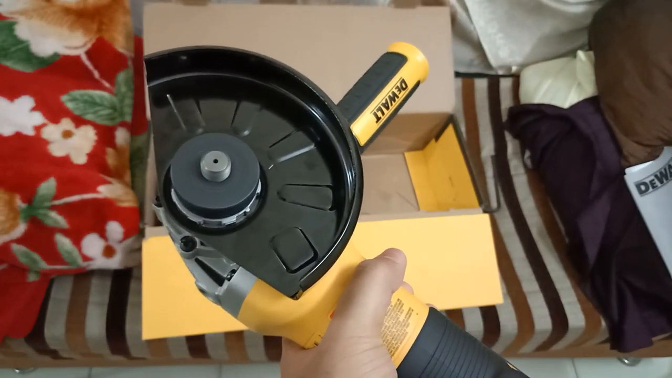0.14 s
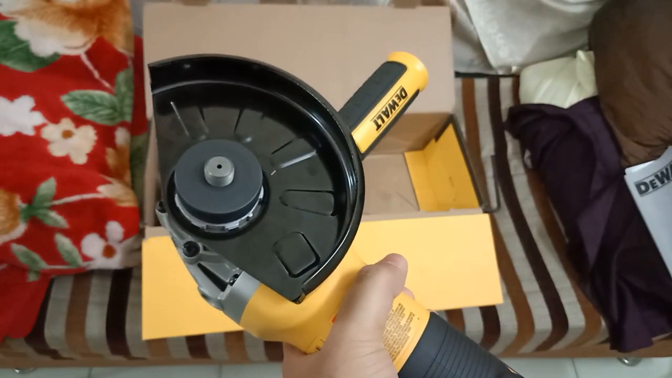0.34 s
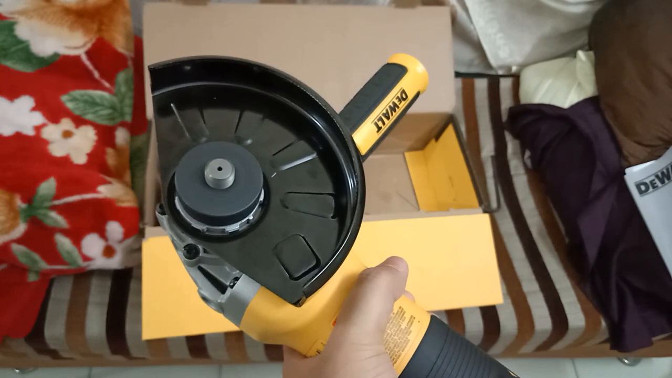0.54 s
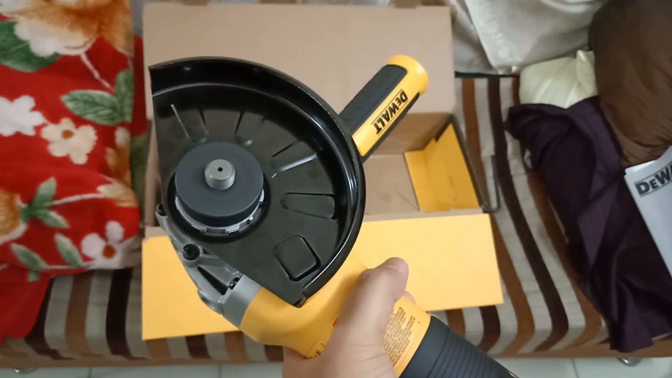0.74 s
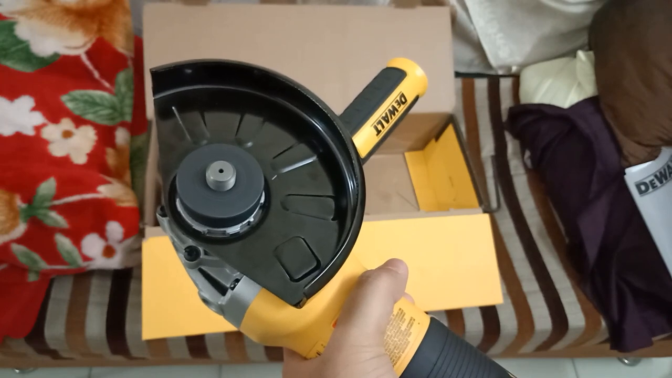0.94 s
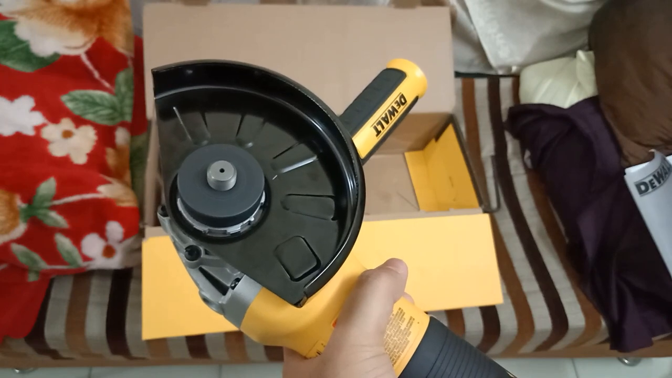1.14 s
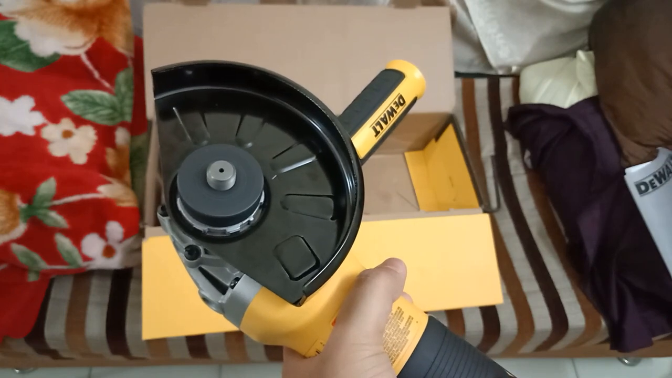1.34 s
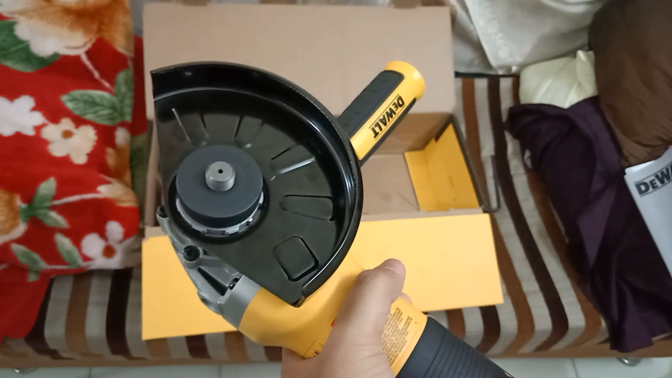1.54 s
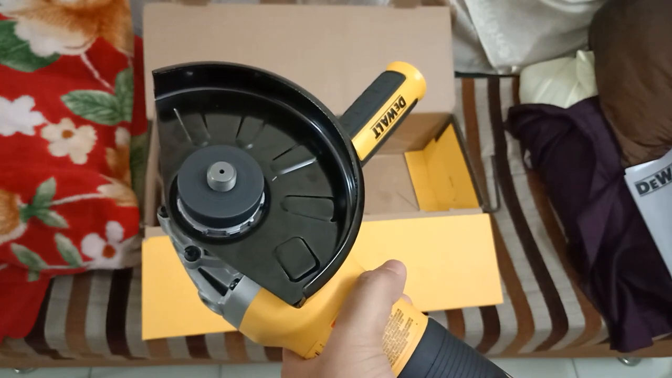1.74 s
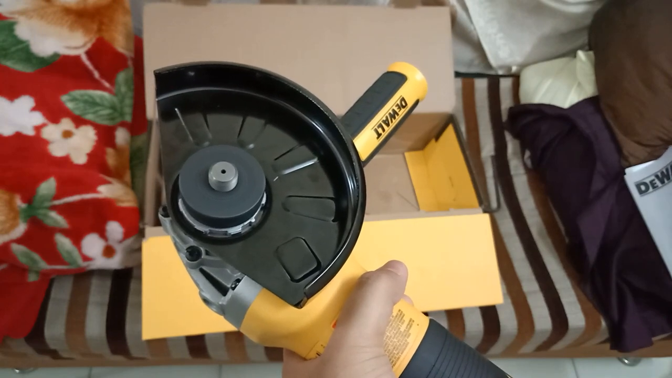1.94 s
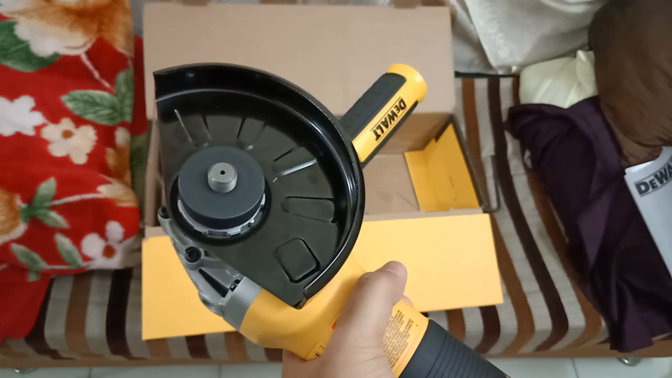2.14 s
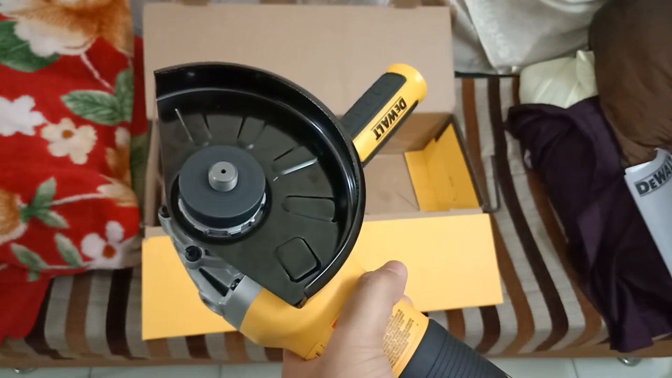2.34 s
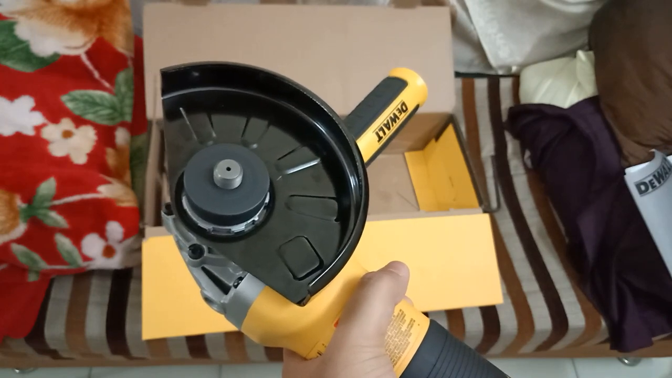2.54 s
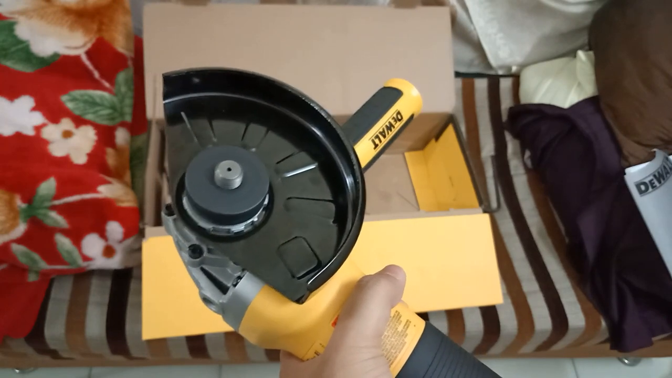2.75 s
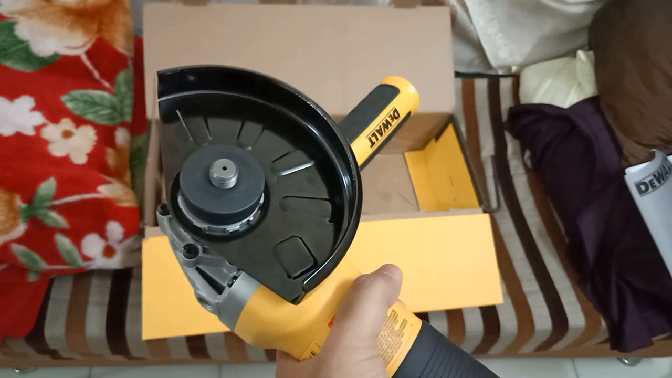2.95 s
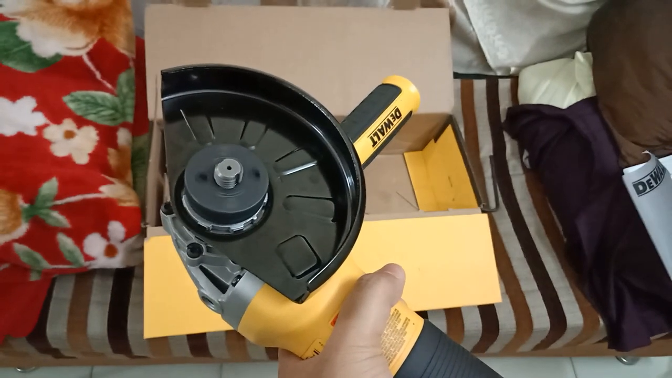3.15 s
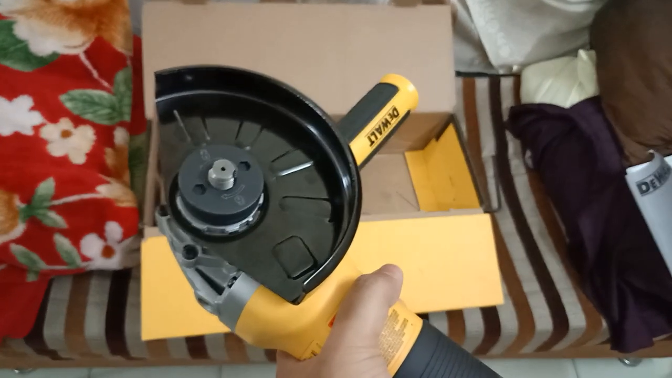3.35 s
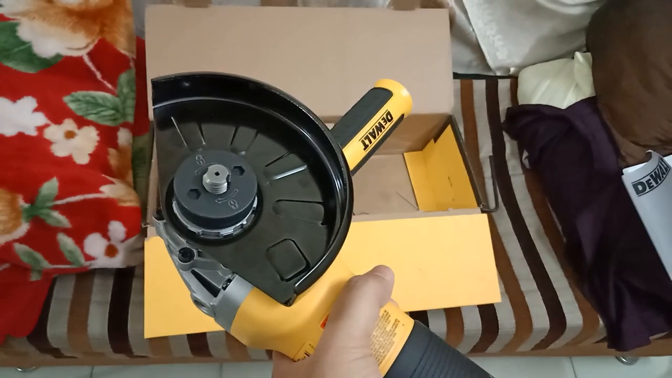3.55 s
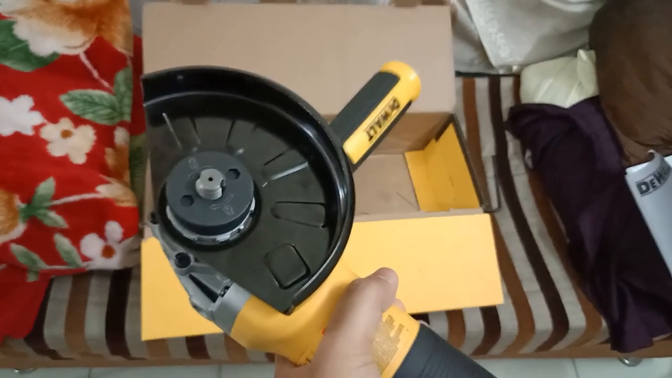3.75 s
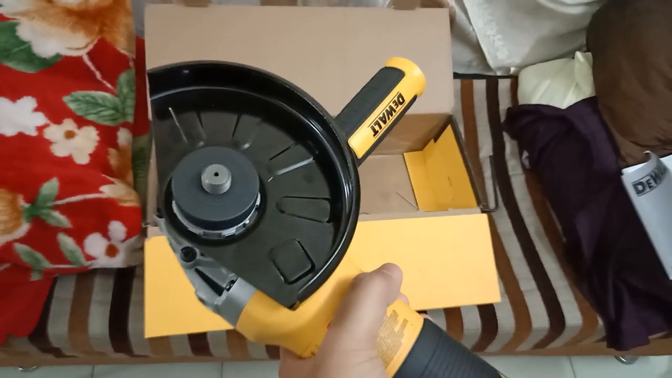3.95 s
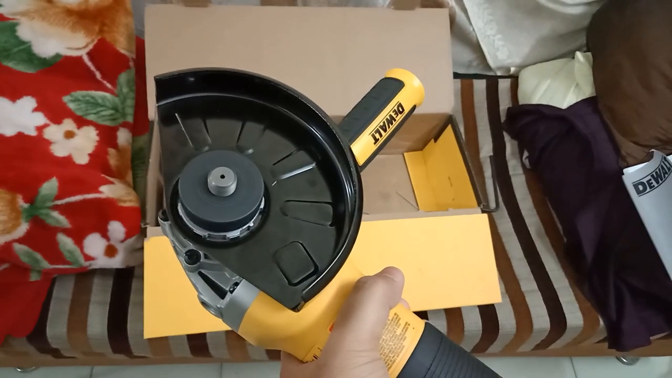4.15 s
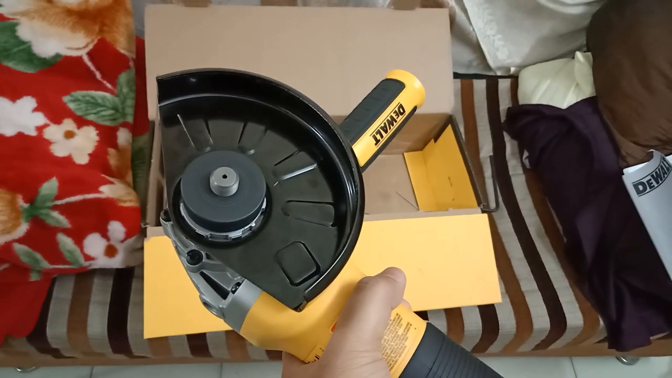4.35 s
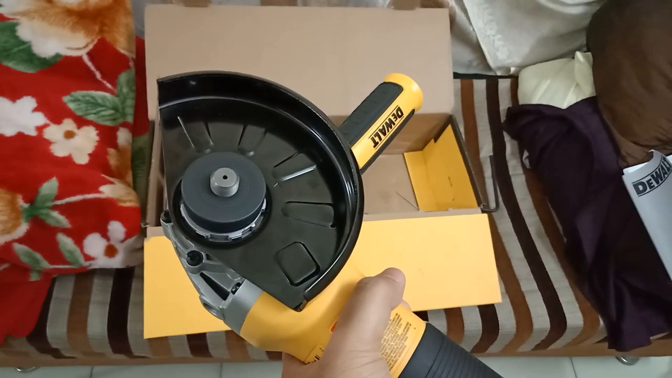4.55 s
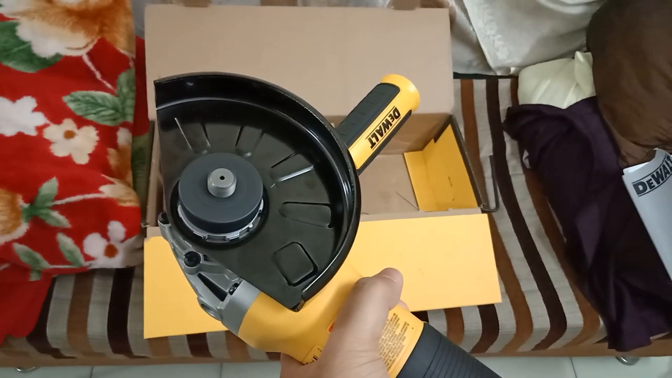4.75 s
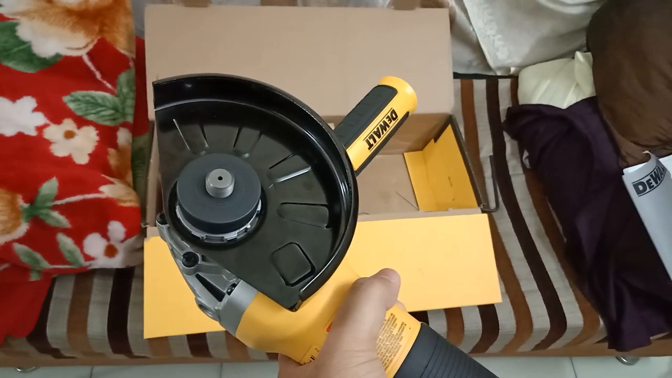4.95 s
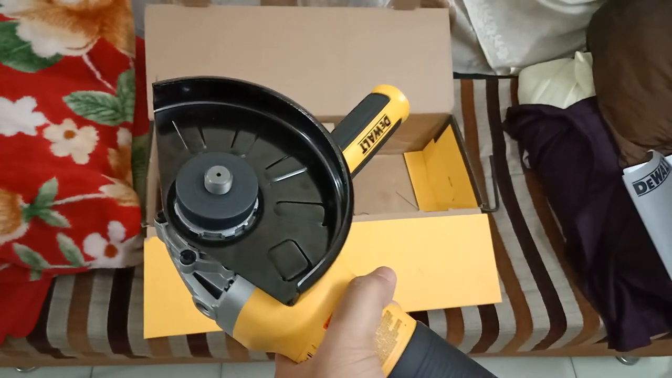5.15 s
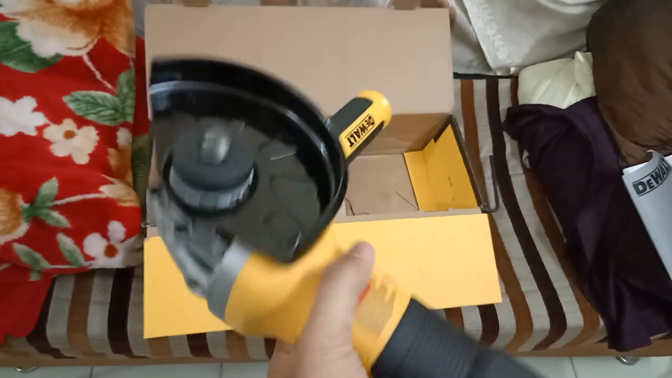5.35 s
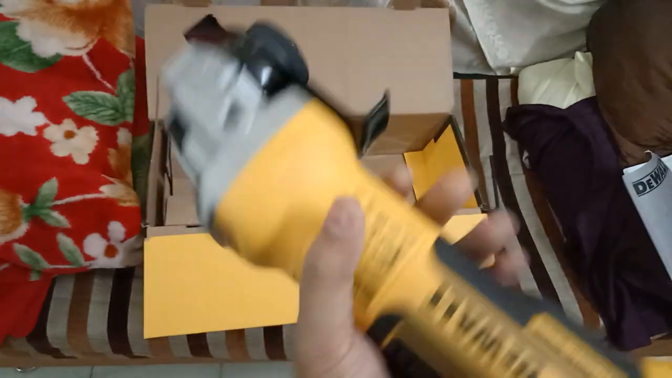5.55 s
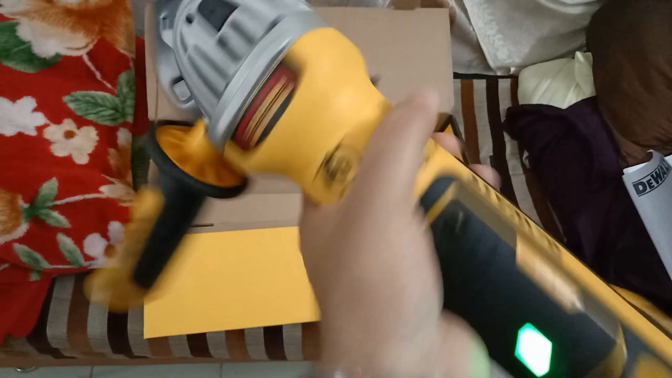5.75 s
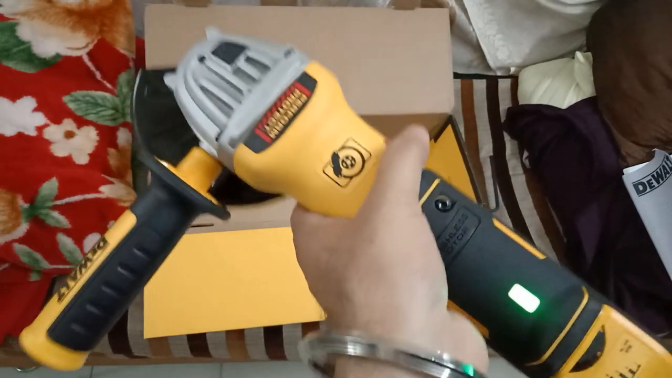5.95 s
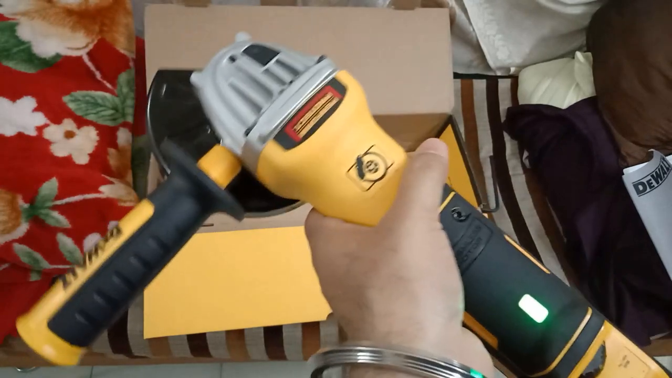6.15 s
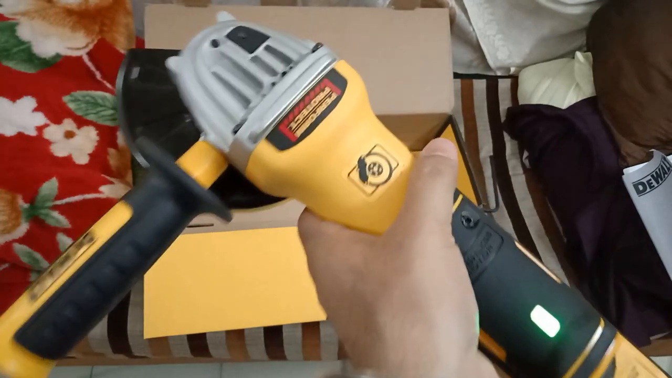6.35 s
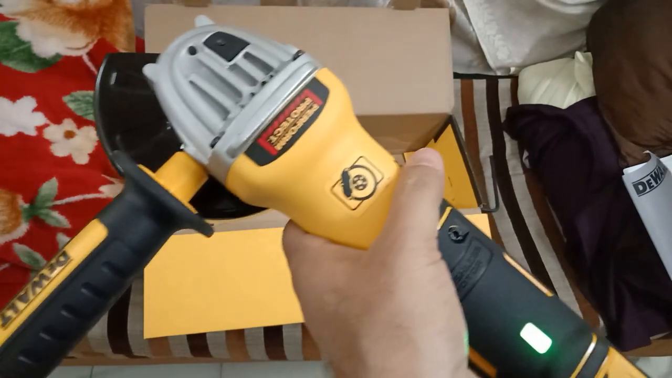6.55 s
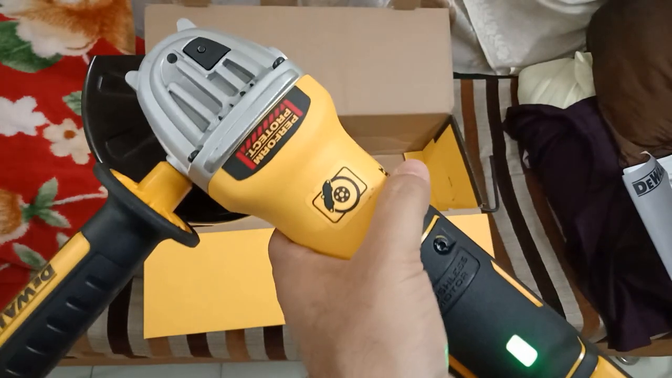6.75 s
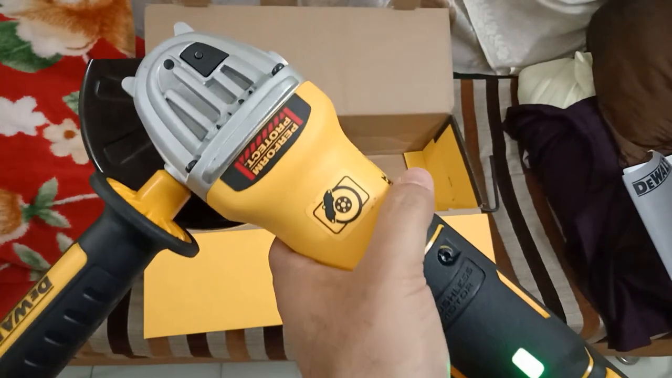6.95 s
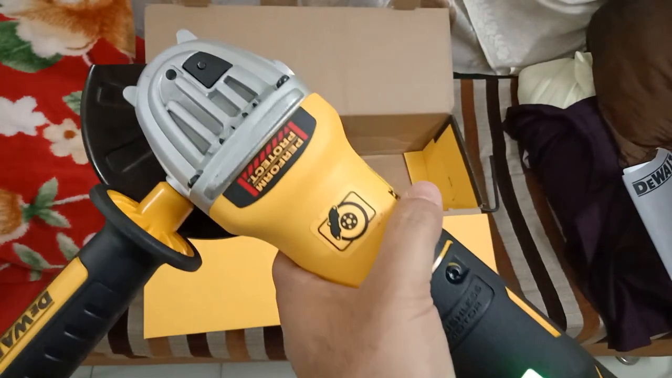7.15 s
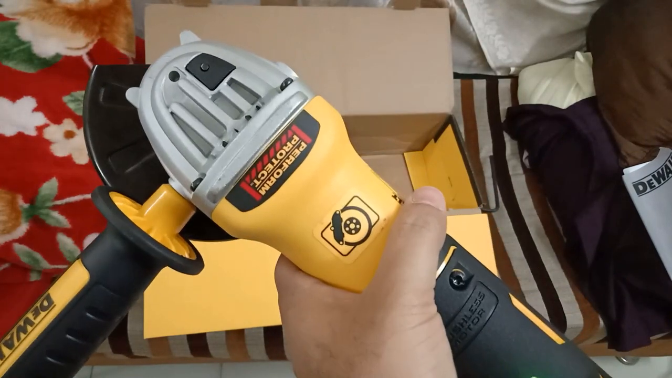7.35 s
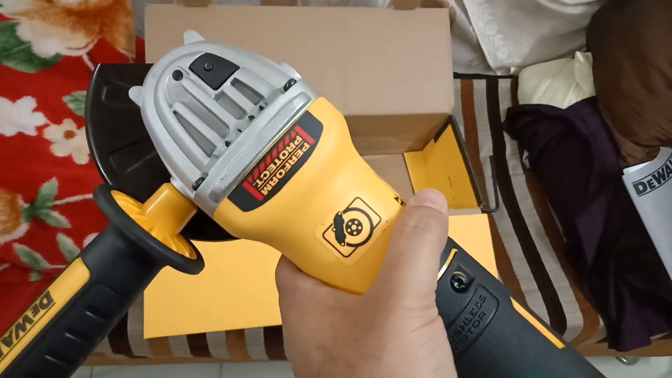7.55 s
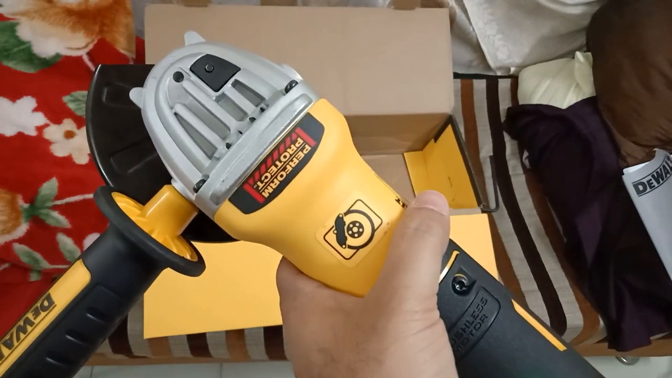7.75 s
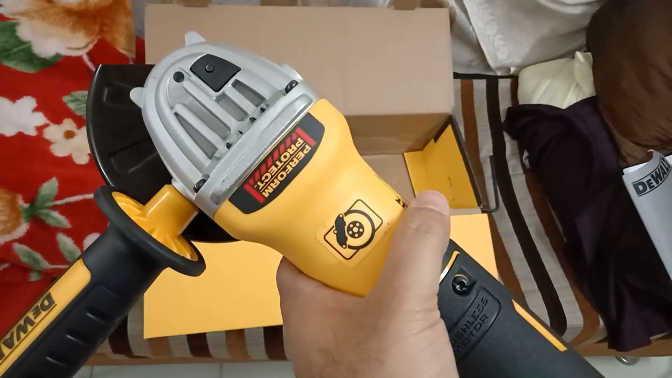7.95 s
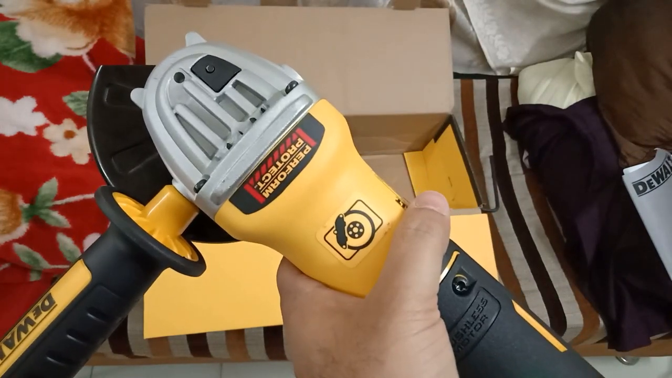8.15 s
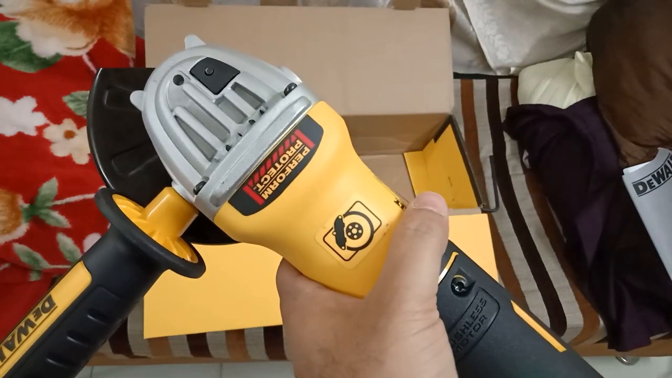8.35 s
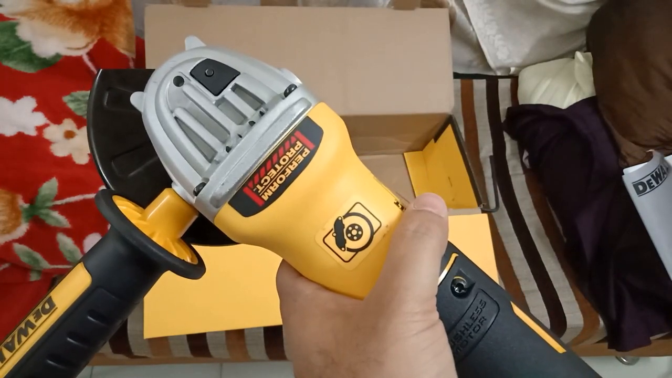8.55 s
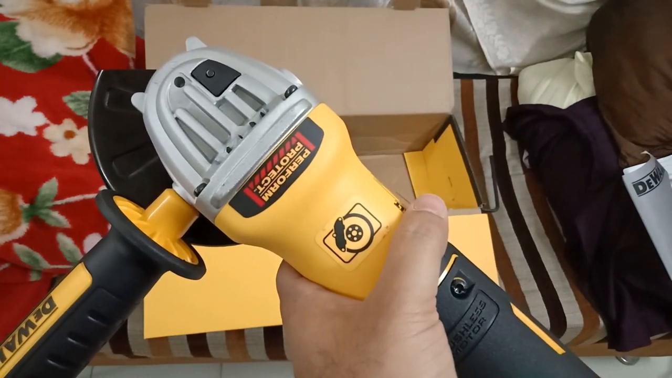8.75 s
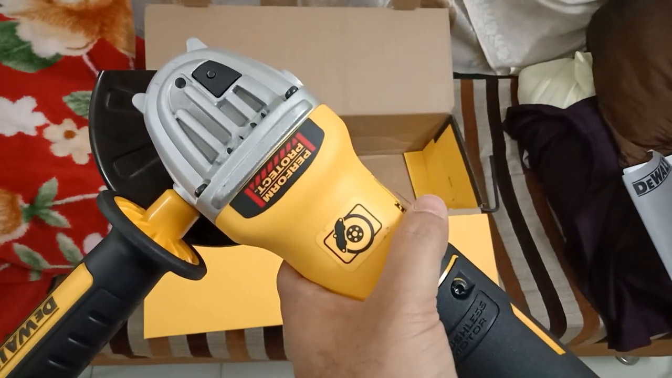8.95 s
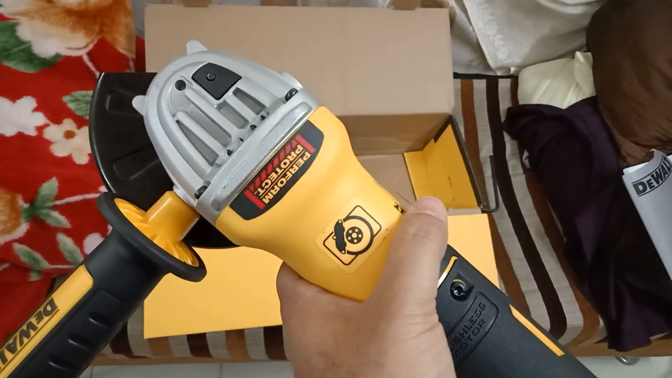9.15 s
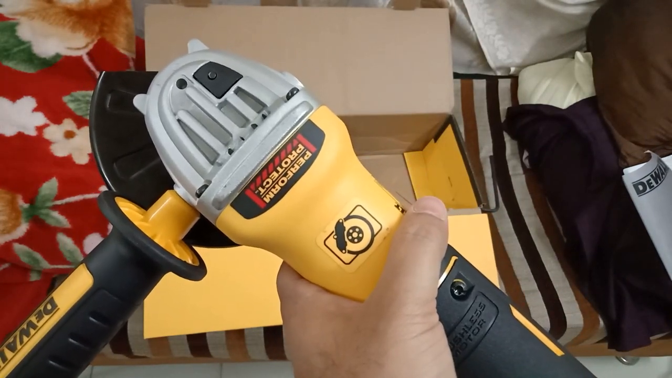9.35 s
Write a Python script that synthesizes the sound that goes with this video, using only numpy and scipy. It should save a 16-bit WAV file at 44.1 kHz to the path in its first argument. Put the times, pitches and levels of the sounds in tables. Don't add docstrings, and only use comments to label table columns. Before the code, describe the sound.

A bare angle grinder is run three times indoors, its harsh rattling whine ramping up, holding, then braking quickly into gear ticks and switch clacks.

```python
import sys
import numpy as np
from scipy import signal
from scipy.io import wavfile
from scipy.ndimage import uniform_filter1d

SR = 44100
rng = np.random.default_rng(int(sys.argv[2]) if len(sys.argv) > 2 else 0)


def generate_wav(signal):
    frames = np.transpose(np.atleast_2d(signal))
    scaled = np.clip(frames, -1, 1) * 32767
    pcm = np.round(scaled).astype(np.int16)
    wavfile.write(sys.argv[1], SR, pcm)


def natural_amplitude(level_db):
    exponent = np.asarray(level_db, float) / 20
    return 10 ** exponent


N = 418641
T = np.arange(N) / SR
HZ = np.fft.rfftfreq(8192, 1 / SR)
TURNED_S, TOP_HZ = 6.2, 450
OVER = T > TURNED_S


def evened(x):
    return x / np.sqrt(np.mean(x ** 2) + 1e-20)


def read(points, hz):
    f, value = np.transpose(points)
    return np.interp(np.log(hz + 1), np.log(f + 1), value)


def coloured(x, gain):
    log_gain = np.log(np.maximum(gain, 1e-5))
    circle = np.concatenate([log_gain, log_gain[-2:0:-1]])
    taps = np.fft.ifft(np.exp(np.conj(signal.hilbert(circle)))).real[:4096]
    return signal.oaconvolve(x, taps)[:len(x)]


def ring(hz, width):
    return 1 / (1 + (2 * (HZ - hz) / width) ** 2)


def wobble(rate_hz):
    pole = np.exp(-2 * np.pi * rate_hz / SR)
    return evened(signal.lfilter([1], [1, -pole], rng.standard_normal(N)))


# [power on t/s, release t/s, top shaft speed f/Hz]
RUNS = [
    (-.305, 2.61, 449.6),
    (3.866, 5.15, 449.6),
    (6.756, 9.9, 449.9),
]
# [t/s after power on, share of top speed]
SOFT_START = [(0, .04), (.094, .166), (.144, .238), (.244, .407), (.344, .574), (.444, .74), (.544, .9),
              (.622, 1)]
# [t/s after release, share of top speed]
BRAKING = [(0, 1), (.018, .86), (.05, .71), (.105, .45), (.135, .28), (.19, .14), (.3, .078), (.44, .036),
           (.74, 0)]


def motion():
    speed, pull = np.zeros(N), np.zeros(N)
    for on, off, top_hz in RUNS:
        rise = np.interp(T - on, *np.transpose(SOFT_START), left=0)
        share = rise * np.interp(T - off, *np.transpose(BRAKING))
        speed += top_hz * share
        pull += (T > on) * (T < on + SOFT_START[-1][0])
        pull -= 1. * (T > off) * (share > 0)
    return speed, pull


# [t/s, gear head level/dB]
EFFORT = [
    [(0, -14), (.2, -18.5), (.3, -16), (.53, -20), (1.15, -21), (1.61, -18), (2.6, -20.5)],
    [(3.87, -20.5), (3.93, -17), (4.02, -11.5), (4.35, -15.5), (4.75, -19.5), (5.15, -20)],
    [(6.76, -18.5), (6.86, -16), (7.4, -15), (7.64, -18.5), (8.08, -18.5), (8.4, -17), (9.49, -18.5)],
]


def effort_db():
    out = np.zeros(N)
    for (on, off, top_hz), rows in zip(RUNS, EFFORT):
        out = np.where(T >= on, np.interp(T, *np.transpose(rows)), out)
    return out


# [t/s after release, level/dB]
RUN_DOWN = [(0, 0.5), (.12, -3.5), (.145, -12.5), (.33, -17.5), (.55, -28), (.63, -36)]


def layer_gains(speed, pull, coast):
    down_db = np.full(N, -120.)
    for on, off, top_hz in RUNS:
        fall = np.interp(T - off, *np.transpose(RUN_DOWN), right=-120)
        down_db = np.where(T >= on, fall, down_db)
    halvings = np.log2(TOP_HZ / np.maximum(speed, 5))
    braking = pull < 0
    head = uniform_filter1d(natural_amplitude(effort_db() + down_db), size=60)
    body_db = np.where(OVER, -7.5, -8) - halvings + 3 * coast - 2 * braking
    fan_db = -16.5 - (3.1 - 0.5 * coast) * halvings + 0.5 * braking
    return head, head * natural_amplitude(body_db), head * natural_amplitude(fan_db)


# [f/Hz, level/dB per Hz]
STRAIN_UP = [(88, -35), (150, -25), (395, -13), (1100, -8.5), (2350, -5.5), (3200, -3.5), (4200, -3),
             (4800, -15), (5500, -24), (7520, -29.5), (9800, -41), (12000, -46.5), (15400, -42)]
FREE_UP = [(88, -64.5), (150, -39.5), (453, -23.5), (764, -24), (1130, -17), (1510, -16.5), (2540, -7),
           (3330, -5), (3530, -5), (3820, -7), (4630, -14.5), (5410, -24.5), (7090, -22.5), (9860, -31.5),
           (15400, -35.5)]
STRAIN_OVER = [(88, -30), (150, -23), (300, -8.5), (750, -3), (900, 1), (1480, -8), (2800, -4),
               (4120, -7.5), (4800, -11.5), (5620, -22), (7500, -29), (10500, -44), (15400, -36)]
FREE_OVER = [(88, -59), (150, -25), (395, -15.5), (444, -15), (642, -14.5), (1040, -4), (1510, -7.5),
             (2740, -1), (3330, -1.5), (3530, -3.5), (3820, -4.5), (5620, -19.5), (7230, -16), (10500, -26),
             (15400, -22.5)]
COAST = [(150, -41), (600, -6), (1000, -6), (1400, -8), (2400, -4.5), (3400, -8), (4400, -9.5), (5300, -33),
         (6000, -34), (8000, -29), (10000, -41), (15400, -57)]
# [f/Hz, width f/Hz, level/dB above each of the five colours in turn]
HEAD_RINGS = [(1100, 100, 4, 4, 4, 5, -3), (1255, 50, 1, 3, 1, 2, -6), (1700, 100, -3, -3, 1, -3, 8),
              (2145, 50, 3, 3, -3, 3, 3), (2765, 55, 9, 6, 9, 5, 7), (3105, 75, 13, 3, 7, -3, 3),
              (3930, 60, -1, -3, 11, -3, 12), (5020, 50, 9, -1, -9, -9, 12), (7450, 150, 8, 1, 5, 3, -3),
              (10900, 700, 8, -9, -6, -9, -9)]


def rattle(speed, pull):
    half_wave_hz = 100.2
    phase = np.where(T < 3, .24, np.where(OVER, .79, .58))
    surge = np.exp(np.cos(2 * np.pi * (half_wave_hz * T - phase)))

    pulling = uniform_filter1d((pull > 0) * np.clip((440 - speed) / 160, 0, 1), size=800)
    coast = uniform_filter1d(1. * (pull < 0) * (speed < 90), size=1500)
    gripping = uniform_filter1d(1. * (pull < 0), size=1500) - coast
    strain = np.maximum(pulling, 0.4 * gripping)
    free = 1 - strain - coast
    shares = [strain * ~OVER, free * ~OVER, strain * OVER, free * OVER, coast]

    hits = rng.random(N) < 1200 * surge / SR
    hit_db = 2.5 * np.minimum(rng.exponential(1, N), 2.5)
    impacts = hits * rng.standard_normal(N) * natural_amplitude(hit_db)
    hammering = .25 + .55 * pulling
    hiss = rng.standard_normal(N) * (1 + (.04 + .33 * pulling) * (surge - 1.3))
    drive = (hiss + hammering * evened(impacts)) / np.sqrt(1 + hammering ** 2)
    drive = drive * natural_amplitude(0.27 * wobble(27))

    low = 1 / (1 + (HZ / 1500) ** 8)
    high = 1 / (1 + (5400 / (HZ + 1)) ** 16)
    parts = [(1 - low) * (1 - high), low, high]
    level_bands = [(HZ > 1600) & (HZ < 3450), (HZ > 250) & (HZ < 1500), HZ > 5500]
    levels = layer_gains(speed, pull, coast)
    out = np.zeros(N)
    for state, colour in enumerate([STRAIN_UP, FREE_UP, STRAIN_OVER, FREE_OVER, COAST]):
        rings = sum(natural_amplitude(r[2 + state]) ** 2 * ring(r[0], r[1]) for r in HEAD_RINGS)
        power = natural_amplitude(read(colour, HZ)) ** 2 * (1 + rings)
        stir = drive * np.sqrt(np.clip(shares[state], 0, 1))
        for part, band, level in zip(parts, level_bands, levels):
            out += coloured(stir * level, np.sqrt(power * part / np.mean(power * band)))
    return out * natural_amplitude(-1.0)


# [multiple of shaft speed, level/dB re whine spindle up, level/dB re whine turned over]
SHAFT_ORDERS = [(1, -27, -18), (2, -26, -18), (4, -20, -19), (36 / 7, -24, -10), (43 / 7, -16, -12),
                (54 / 7, -18, -22), (8, 0, 0), (9, -26, -17), (10, -20, -28), (16, -37, -32),
                (20, -35, -28), (30, -48, -41), (40, -33, -28)]
# [f/Hz, level/dB]
RADIATES = [(200, -16), (1100, -4), (1500, -8), (2800, 0), (3600, 0), (4300, 5), (4800, 0), (5600, -18),
            (9000, -22), (10500, -27), (12000, -20), (18000, -22)]
PULL_AND_BRAKE = {4: (12, 37, 6), 8: (5, 15, -40), 16: (0, 0, 6), 20: (-5, 12, -9), 30: (0, 6, -6),
                  40: (11, 15, -1)}


def whine(speed, pull):
    braking, jerk = pull < 0, abs(pull)
    pace = speed / TOP_HZ
    lag = np.clip(1 - pace, 0, 1)
    strain_db = np.where(OVER, -9.5, -13.5) * np.sqrt(lag)
    level_db = effort_db() + np.where(OVER, -5.5, 0.9) + np.where(braking, -0.5, strain_db)
    level = uniform_filter1d(natural_amplitude(level_db), size=400)
    turns = np.cumsum(speed * (1 + 0.00024 * wobble(4.1))) / SR
    swell = pace ** np.where(braking, .6, .8)
    current = np.where(braking, np.clip(speed / 60 - 2.5, 0, 1), 1) * natural_amplitude(4 * jerk * wobble(40))
    loaded = pace ** np.where(braking, 14, 2.2) * natural_amplitude(2 * jerk * wobble(30))
    out = np.zeros(N)
    for multiple, up_db, over_db in SHAFT_ORDERS:
        gain_db = np.where(OVER, over_db, up_db)
        gain_db = gain_db + read(RADIATES, multiple * speed) - read(RADIATES, multiple * TOP_HZ)
        source = loaded if multiple < 18 else current
        if multiple in PULL_AND_BRAKE:
            pull_db, pull_over_db, brake_db = PULL_AND_BRAKE[multiple]
            brake_tone = current * natural_amplitude(brake_db) + source * (multiple == 8)
            pull_tone = source * natural_amplitude(np.sqrt(lag) * np.where(OVER, pull_over_db, pull_db))
            source = np.where(braking, brake_tone, pull_tone)
        tone = np.cos(2 * np.pi * (multiple * turns + rng.random()))
        out += natural_amplitude(gain_db + .9 * wobble(10)) * source * tone
    return np.sqrt(2) * level * swell * out


def drive_song(speed, pull):
    switching_hz = 9955
    turns = np.cumsum(speed) / SR
    pulling_db = np.where(OVER, -47, -58) - 14 * (speed / TOP_HZ) ** 2
    level_db = np.where(pull > 0, pulling_db, np.where(pull < 0, -78, -62))
    level = uniform_filter1d(natural_amplitude(level_db) * (speed > 3), size=1500)
    level = level * np.clip(speed / 14, 0, 1) ** 1.5 * natural_amplitude(2.5 * wobble(30))
    first_brake = (pull < 0) & (T < 4)
    lower = np.where(first_brake, .4, 1) * np.cos(2 * np.pi * (switching_hz * T - 4 * turns))
    upper = np.where(first_brake, 1.3, .65) * np.cos(2 * np.pi * (switching_hz * T + 4 * turns))
    return level * (lower + upper)


def add(mix, s, peak_db, shake, gain):
    sound = coloured(shake, gain * HZ / (HZ + 400))
    mix[round(s * SR):][:len(sound)] += natural_amplitude(peak_db) * sound / abs(sound).max()


# [t/s, peak level/dB, dullness 0 gear blow to 1 switch clack, t60 t/s]
KNOCKS = [
    (2.743, -13.5, 0.3, 0.08),
    (3.866, -14, 0.95, 0.13),
    (5.271, -6, 0.44, 0.063),
    (6.758, 0.5, 0.67, 0.088),
    (3.769, -15, 0.92, 0.21),
    (6.66, -5, 1, 0.2),
]
# [f/Hz, width f/Hz, gear blow level/dB, switch clack level/dB]
KNOCK_RINGS = [(400, 300, -22, -10), (680, 250, -18, -6), (1170, 260, -12, 2), (1800, 700, -7, -17),
               (2650, 320, -6, -7), (3100, 600, 0, -16), (4000, 1000, -6, -27), (7300, 2200, -21, -27),
               (12000, 8000, -27, -38)]
# [t/s, peak level/dB]
TICKS = [(3.0594, -34), (3.0994, -35), (3.1994, -36), (3.2335, -26), (3.253, -26), (3.2849, -33),
         (3.3194, -30), (3.3413, -29), (3.3544, -28), (3.3782, -33), (5.6294, -32), (5.669, -33),
         (5.6925, -33), (5.7044, -31), (5.7184, -28), (5.7374, -29), (5.7638, -25), (5.7887, -32),
         (5.8277, -31), (5.8436, -27), (5.8616, -26)]
# [f/Hz, width f/Hz, level/dB]
TICK_RINGS = [(1000, 900, -12), (1700, 400, -8), (2100, 400, -7), (2750, 300, -2), (3080, 300, 0),
              (3930, 300, -9), (4500, 500, -15), (5050, 150, -19), (6200, 300, -42)]


def knocks():
    out, t = np.zeros(N + SR), np.arange(SR // 4) / SR
    for s, peak_db, dull, t60 in KNOCKS:
        power = sum(natural_amplitude((1.5 - dull) * blow_db + dull * clack_db) ** 2 * ring(hz, width) ** 2
                    for hz, width, blow_db, clack_db in KNOCK_RINGS)
        decay = natural_amplitude(-60 * t / .015) + .4 * natural_amplitude(-60 * t / t60)
        add(out, s, peak_db, rng.standard_normal(len(t)) * decay, np.sqrt(power))
    power = sum(natural_amplitude(db) ** 2 * ring(hz, width) ** 2 for hz, width, db in TICK_RINGS)
    decay = natural_amplitude(-60 * t / .025) + .2 * natural_amplitude(-60 * t / .08)
    for s, peak_db in TICKS:
        add(out, s, peak_db, rng.standard_normal(len(t)) * decay, np.sqrt(power))
    return out[:N]


def room(x):
    taps = np.zeros(SR // 2)
    at = np.arange(200, len(taps) - 20, 20)
    taps[at + rng.integers(0, 20, len(at))] = rng.choice([-1., 1.], len(at))
    hz, t, z = signal.stft(taps, SR, nperseg=256)
    t60 = read([(300, 0.54), (3000, 0.69), (12000, 0.45)], hz)[:, None]
    tail = signal.istft(z * natural_amplitude(-60 * t / t60), SR, nperseg=256)[1]
    return signal.oaconvolve(x, tail / np.linalg.norm(tail))[:N]


# [f/Hz, level/dB per Hz]
FLOOR_COLOUR = [(150, -9.5), (300, -1), (700, -6), (1200, -8.5), (2000, -14.5), (3200, -23.5),
                (4300, -30.5), (5000, -46.5), (6000, -51), (14000, -70)]
# [f/Hz, level/dB]
RUMBLE_COLOUR = [(20, -67), (45, -6.5), (75, 6.5), (130, 4), (200, -5), (400, -45), (1500, -88)]
# [centre t/s, peak level/dB, half length t/s]
GUSTS = [(.2, -59, 0.49), (1.024, -38, 0.036), (1.197, -50, .1), (1.452, -51, 0.037), (1.673, -35.5, 0.031),
         (1.927, -35, 0.016), (2.035, -48, .02), (2.32, -45, 0.092), (2.857, -35, 0.017),
         (2.919, -36.5, 0.015), (3.0, -37.5, 0.028), (3.118, -44, .06), (3.284, -45, 0.029),
         (3.354, -37, .035), (3.584, -45.5, 0.12), (3.7, -42, .035), (3.797, -28, 0.024), (3.86, -45, .025),
         (3.928, -34, 0.028), (4, -25.5, 0.024), (5.15, -54, .2), (6.237, -43, 0.037), (6.496, -52, 0.23),
         (6.99, -47, 0.059), (7.55, -54, .06), (8.875, -51, 0.043)]


def room_floor():
    floor_db, hold_s, rise_db_per_s, calm_db = -53.5, 0.2, 12, -60.5
    waited = np.zeros(N)
    for on, off, top_hz in RUNS:
        waited = np.where(T >= on, np.maximum(T - off - hold_s, 0), waited)
    air = evened(coloured(rng.standard_normal(N), natural_amplitude(read(FLOOR_COLOUR, HZ))))
    air = air * natural_amplitude(.6 * wobble(8))
    lumps = evened(coloured(rng.standard_normal(N), natural_amplitude(read(RUMBLE_COLOUR, HZ))))
    slow = T[::64]
    gusts = natural_amplitude(calm_db) + sum(natural_amplitude(db) * np.exp(-((slow - s) / half_s) ** 2) for s, db, half_s in GUSTS)
    return air * natural_amplitude(floor_db + rise_db_per_s * waited) + lumps * np.interp(T, slow, gusts)


def scene():
    speed, pull = motion()
    blows, noise = knocks(), rattle(speed, pull)
    tones = whine(speed, pull) + drive_song(speed, pull)
    echo = room(natural_amplitude(-10.0) * noise + natural_amplitude(-8.5) * blows)
    return (tones + noise + blows + echo + room_floor())[None]


def low_pass(x):
    return signal.sosfilt(signal.butter(12, 15940, fs=SR, output="sos"), x)


def record(dry):
    edge = signal.firwin(801, 15520, window=("kaiser", 9), fs=SR)
    limited = 1.1 * np.tanh(dry / 1.1)
    mix = signal.oaconvolve(limited, edge[None], "same")
    return low_pass(mix)


dry = scene()
out = record(dry)
generate_wav(out)
```